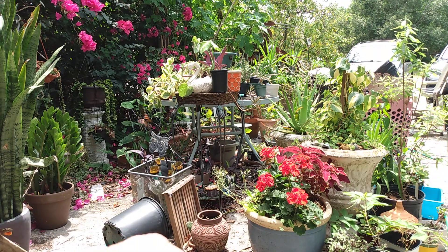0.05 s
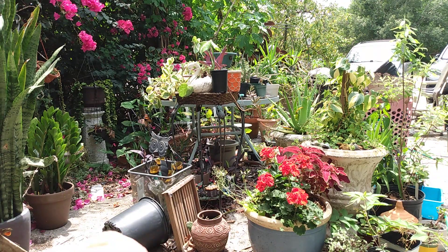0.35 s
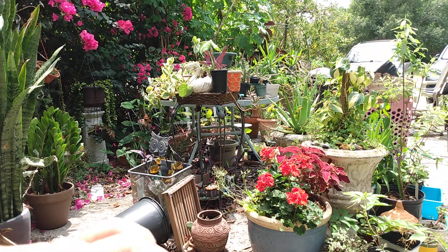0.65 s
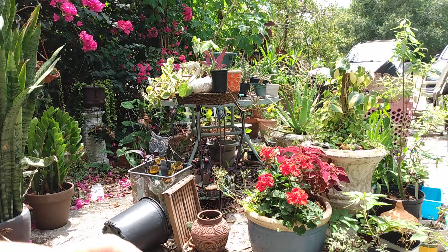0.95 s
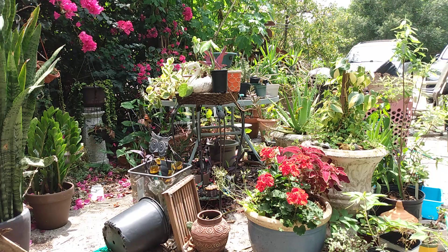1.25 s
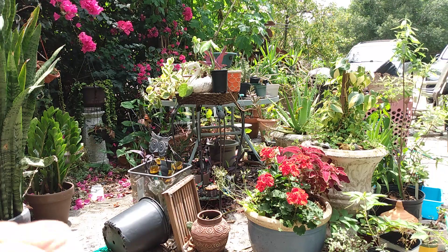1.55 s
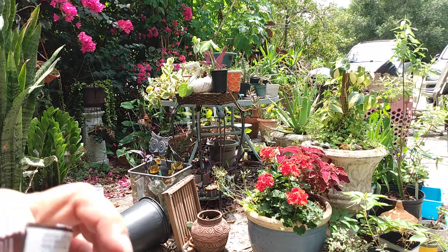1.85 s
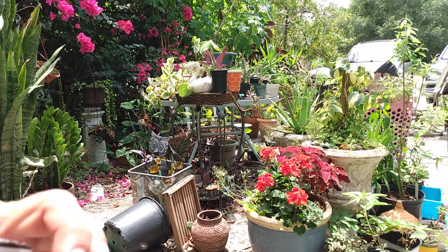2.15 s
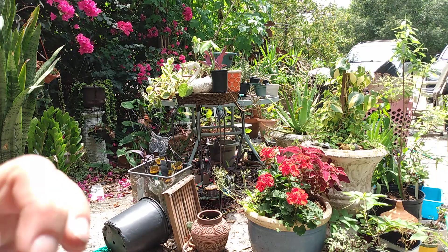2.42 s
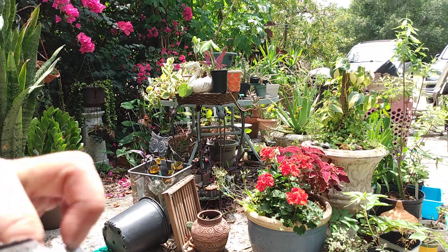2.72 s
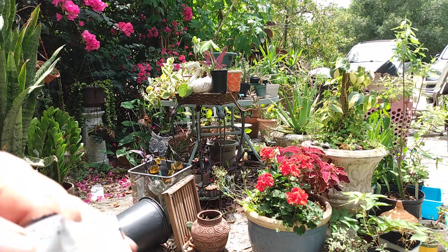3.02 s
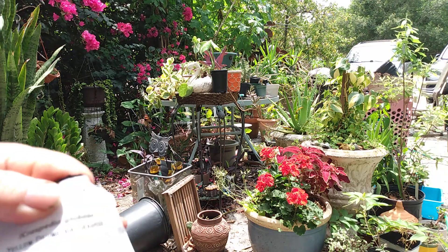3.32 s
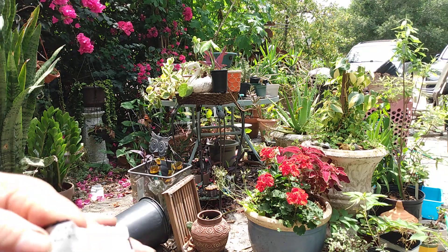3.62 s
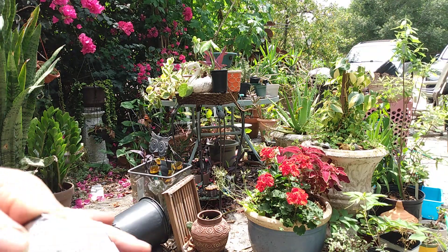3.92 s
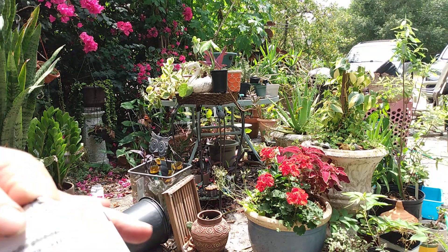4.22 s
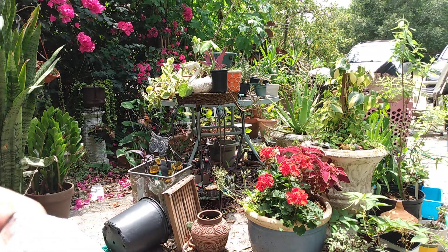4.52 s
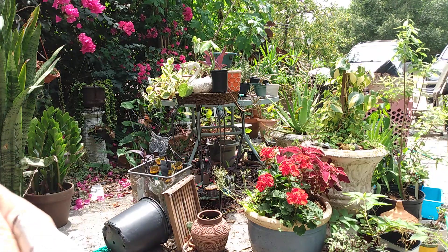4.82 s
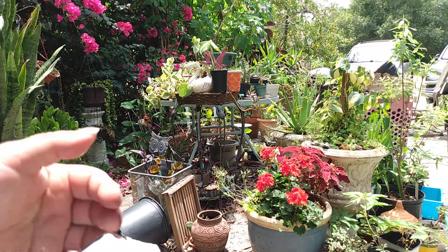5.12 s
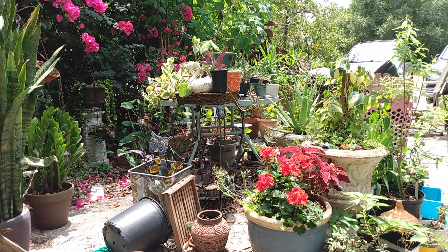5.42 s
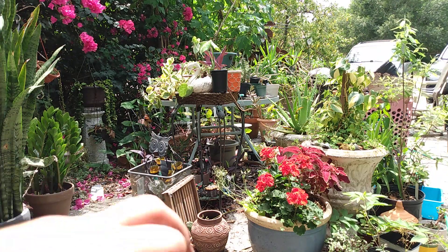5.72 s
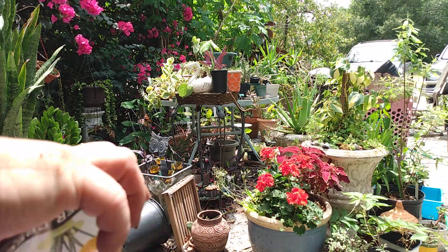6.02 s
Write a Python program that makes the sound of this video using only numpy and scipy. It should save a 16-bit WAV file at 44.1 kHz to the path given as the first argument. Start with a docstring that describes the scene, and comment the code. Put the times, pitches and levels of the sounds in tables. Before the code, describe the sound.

A paper seed packet is torn open and handled close by, with crinkles, crackles and short rips over a quiet garden's distant rumble.

```python
"""A paper seed packet, torn open and worked about by hand, close to the left of a camera's stereo microphone.
Fingers rub over the sheet, creases buckle and snap, and fibres part in short rips. A fingertip
catches and squeaks, and the packet bumps softly like a small drum.
The place is a quiet garden: far traffic and machines rumble and hum, under a faint hiss."""
import sys
import numpy as np
from scipy import signal
from scipy.fft import rfft, irfft, next_fast_len
from scipy.io import wavfile
from scipy.ndimage import uniform_filter1d, map_coordinates

SR = 44100
rng = np.random.default_rng(int(sys.argv[2]) if len(sys.argv) > 2 else 0)


def inscribe(sig):
    """Save sig as 16-bit PCM at rate SR to the path in sys.argv[1].

    A 1-D sig is mono; a 2-D sig holds one channel per row.
    Samples are clipped to [-1, 1] before scaling.
    """
    pcm = np.round(np.clip(np.atleast_2d(sig).T, -1, 1) * 32767)
    wavfile.write(sys.argv[1], SR, pcm.astype(np.int16))


N = 271215
T = np.arange(N) / SR
TOP_HZ = 16050  # the camera's band limit


def amp(db):
    return 10 ** (np.asarray(db) / 20)


def unit(x):
    """x at rms 1."""
    return x / np.sqrt(np.mean(x ** 2, axis=-1, keepdims=True) + 1e-20)


def curve(points):
    """One value per sample from (seconds, value) points."""
    return np.interp(T, *np.transpose(points))


def wobble(rate):
    """A smooth random curve, rate knots a second."""
    return map_coordinates(rng.standard_normal(int(N * rate / SR) + 4), [T * rate])


def filtered(x, response):
    """x through a gain that depends on frequency."""
    size = next_fast_len(N + SR // 4)
    return irfft(rfft(x, size) * response(np.fft.rfftfreq(size, 1 / SR)), size)[..., :N]


def equalised(x, points):
    """x through (Hz, dB) points joined on a log axis."""
    knots_hz, db = np.transpose(points)
    return filtered(x, lambda hz: amp(np.interp(np.log(hz + 1), np.log(knots_hz + 1), db)))


def coloured(x, spectrum):
    """x shaped by a spectrum, at rms 1."""
    return unit(equalised(x, spectrum))


def resonant(x, modes):
    """x through (Hz, width in Hz, dB) resonances, at rms 1."""
    def response(f):
        return sum(amp(db) / (1 + (2 * (f - hz) / width) ** 2) for hz, width, db in modes)
    return unit(filtered(x, response))


def band(x, edges_hz, order=3):
    """Causal band-pass."""
    return signal.sosfilt(signal.butter(order, edges_hz, "band", fs=SR, output="sos"), x)


def add(track, start, x):
    """Mix x into the track from start, in seconds."""
    part = track[..., max(round(start * SR), 0):][..., :x.shape[-1]]
    part += x[..., :part.shape[-1]]


def crackle(rate, spread_db, grain_t60, smooth):
    """One stream of tiny slips of uneven size over smooth friction noise, along two paths."""
    slips = rng.random(N) < rate / SR
    sizes = slips * amp(spread_db * np.minimum(rng.standard_normal(N), 2))
    grain_power = amp(-120 * T[:SR // 50] / grain_t60)
    power = np.abs(signal.fftconvolve(sizes ** 2, grain_power)[:N])
    return np.sqrt(power / power.mean() + smooth ** 2) * rng.standard_normal((2, N))


def flexing(x, depth_db):
    """The sheet's resonances keep shifting as it bends."""
    spectra = signal.stft(x, nperseg=256)[2]
    drift = uniform_filter1d(rng.standard_normal(spectra.shape[1:]), size=3, axis=0)  # over frequency
    drift = uniform_filter1d(drift, size=16, axis=1)  # over time
    spectra = spectra * amp(depth_db * drift / drift.std())
    return unit(signal.istft(spectra, nperseg=256)[1][..., :N])


# Far rumble, and a far hum that swells late. Each row: time in seconds, relative level in dB.
RUMBLE_SWELL = [(0, -60), (.7, -61.5), (1.5, -56.5), (2.2, -64.5), (3.2, -58.5), (4.2, -58), (5.2, -63),
                (6.15, -65)]
HUM_SWELL = [(0, -74), (2.2, -75.5), (4.6, -58.5), (5.25, -61.5), (5.45, -59), (5.62, -53), (5.85, -58),
             (6.15, -78)]
# Colours of the rumble and the faint hiss. Each row: frequency in Hz, relative level in dB.
RUMBLE_SPECTRUM = [(20, -67), (35, -7), (50, -4.5), (75, 1), (110, -2.5), (180, -8), (340, -12.5),
                   (450, -17.5), (800, -62)]
HISS_SPECTRUM = [(200, -11.5), (400, -13), (700, -5), (1100, -14.5), (2500, -13.5), (4500, -17),
                 (7000, -21.5), (16000, -22.5)]
# Resonances of the hum. Each row: centre in Hz, width in Hz, relative level in dB.
HUM_MODES = [(283, 19, 3), (310, 64, 9)]
# Far motors. Each row: pitch in Hz, relative level in dB.
MOTOR_TONES = [(79, -62.5), (223, -67)]


def garden(rumble_db=6.0, apart=0.17, hiss_db=-64.5, waver_db=3.5):
    """Far traffic and machines reach both microphone ports much alike; the hiss differs between them."""
    far = rng.standard_normal(N) + apart * rng.standard_normal((2, N))
    rumble = amp(curve(RUMBLE_SWELL) + rumble_db) * coloured(far, RUMBLE_SPECTRUM)
    hum = amp(curve(HUM_SWELL)) * resonant(rng.standard_normal(N), HUM_MODES)
    motors = np.zeros(N)
    for hz, db in MOTOR_TONES:
        peak = np.sqrt(2) * amp(db + waver_db * wobble(4.7))
        motors += peak * np.sin(2 * np.pi * hz * T + 0.66 * wobble(6.6))
    hiss = amp(hiss_db) * coloured(rng.standard_normal((2, N)), HISS_SPECTRUM)
    return (rumble + hum + motors + hiss) * amp([[1.7], [-1.7]])  # a little louder on the left


# Finger strokes. Each row: start in seconds, length in seconds, relative level in dB, brightness in dB.
FINGER_STROKES = [(0, 0.03, -41, -5), (0.076, 0.058, -59, 6), (0.179, 0.02, -57, 3.5),
                  (0.215, .06, -58, 2.5), (0.401, 0.076, -53, -4.5), (0.506, 0.061, -57.5, 2),
                  (0.59, 0.14, -60, 8), (0.738, 0.038, -46, -11), (0.791, 0.031, -46, 13.5),
                  (0.83, 0.12, -42.5, 2), (0.96, .06, -53, -3), (1.026, 0.035, -40.5, 1),
                  (1.082, 0.038, -44.5, 3), (1.207, .1, -39.5, -2), (1.296, 0.1, -44, 3.5),
                  (1.406, 0.032, -47, 1), (1.483, 0.038, -51, 0), (1.567, 0.077, -36.5, 1.5),
                  (1.658, 0.11, -49.5, -1.5), (1.82, 0.074, -52, -2.5), (1.927, 0.092, -58, 0),
                  (2.149, 0.0071, -62, 8.5), (2.26, 0.016, -56.5, 1), (2.399, .11, -58, 1),
                  (2.532, 0.077, -53, -2.5), (2.579, 0.066, -49.5, 2), (2.652, 0.053, -53.5, -0.5),
                  (2.732, 0.066, -54.5, 4), (2.771, 0.034, -41, -2), (2.933, 0.068, -56, 4),
                  (3, .085, -55.5, 2), (3.075, .14, -47, -4.5), (3.208, 0.14, -46.5, -2),
                  (3.309, 0.038, -43, -9), (3.355, 0.053, -40, -6), (3.44, .13, -46.5, -3),
                  (3.59, 0.28, -60.5, -3), (3.727, .125, -51, 1.5), (3.853, 0.19, -50, -7.5),
                  (3.948, 0.12, -49.5, -12.5), (4.116, .16, -51.5, -5), (4.312, 0.19, -54.5, 5.5),
                  (4.491, 0.071, -52, 4), (4.541, 0.094, -52.5, 0), (4.623, 0.13, -59, -0.5),
                  (4.717, 0.087, -52, -1.5), (4.884, .1, -54, -1.5), (4.971, 0.11, -50, 1),
                  (5.095, 0.023, -53, -1.5)]


def friction(arch=0.33, release_s=0.012, body_db=-2, body_per_bright=-0.61):
    """Low, middle and top amplitudes of the rubbing: in each stroke a finger speeds up, slows and stops."""
    power = np.zeros((3, N))
    for start, length, db, bright in FINGER_STROKES:
        progress = np.minimum(T[:SR // 3] / length, 1)
        swell = (4 * progress * (1 - progress)) ** arch
        flex_db = body_db + body_per_bright * bright  # light, bright strokes flex the sheet less
        colour = amp([[flex_db], [0], [bright]])
        add(power, start, (amp(db) * colour * swell) ** 2)
    decay = np.exp(-2 / (release_s * SR))
    return np.sqrt(signal.lfilter([1 - decay], [1, -decay], power) + 1e-20)


# Rubbed paper, heard close. Each row: frequency in Hz, relative level in dB.
RUB_SPECTRUM = [(71, -60), (120, 11.5), (217, 1.5), (251, -6.5), (370, -5), (473, -18.5), (856, -17),
                (1900, -14), (2240, -12), (3380, -17), (3900, -17.5), (5750, -16.5), (14700, -11.5),
                (16000, -17)]
# The paper's body, middle and top bands. Each row: lower edge in Hz, upper edge in Hz.
PAPER_BANDS = [(150, 900), (900, 4500), (4500, 16500)]


def rustle(middle_db=-0.45, top_db=-2, grip_db=1.5):
    """Fingers drag over the sheet with an uneven grip: coarse crinkles below, fine friction above."""
    low_swell, middle_swell, top_swell = friction()
    crinkles = crackle(rate=350, spread_db=2.0, grain_t60=0.0024, smooth=1.0)
    coarse = flexing(coloured(crinkles, RUB_SPECTRUM), depth_db=6.0)
    fine = coloured(crackle(rate=6300, spread_db=9.5, grain_t60=0.0022, smooth=0.62), RUB_SPECTRUM)
    low = low_swell * unit(band(coarse, (250, 1000)))
    middle = middle_swell * amp(middle_db) * unit(band(coarse + fine, PAPER_BANDS[1], order=4))
    top = top_swell * amp(top_db) * unit(band(fine, PAPER_BANDS[2]))
    return amp(grip_db * wobble(70)) * (low + middle + top)


def small_creases(per_s=26, until_s=5.13, ring_hz=2150, over_rub_db=1, spread_db=6, per_bright=-0.58):
    """Small creases give way at random, as strong as the rubbing allows; rows as in LOUD_CREASES."""
    _, middle, top = friction()
    count = int(per_s * until_s)
    moments = ((np.arange(count) + rng.random(count)) * SR / per_s).astype(int)
    rows = []
    for i, (size, octaves, weight, edge) in zip(moments, rng.uniform(-0.91, 1, (count, 4))):
        brightness = top[i] / middle[i]
        # light, bright slides buckle the sheet less
        rub_db = 20 * np.log10(middle[i]) + per_bright * 20 * np.log10(brightness)
        level_db = rub_db + over_rub_db + spread_db * size
        body_db = 5 + 3 * weight
        sharpness = 0.44 * brightness + 0.96 * edge
        rows.append((T[i], ring_hz * 2 ** octaves, level_db, body_db, sharpness))
    return rows


# Loud creases buckling. Each row: start in seconds, ring of the freed facet in Hz,
# relative level in dB, extra body in dB, sharpness from 0 to 1.
LOUD_CREASES = [(0.0097, 2860, -29.5, -2.5, 0.7), (0.4557, 4100, -30, -11, 0.62),
                (0.6197, 2900, -41.5, -3, 1), (0.6982, 3630, -34, -9, 0.44), (0.7421, 4870, -23, -8, 1),
                (0.763, 3100, -24, -28, 0.85), (0.8005, 2500, -34, -14, 0.5),
                (1.067, 4000, -23.5, -9.5, 0.64), (1.0927, 3700, -25.5, -17, .9),
                (1.213, 3840, -25, -10, 0.54), (1.2277, 3700, -31.5, -15, .7),
                (1.2367, 2220, -27.5, -24, .55), (1.2564, 3740, -24.5, -5, 0.89),
                (1.2943, 3800, -24.5, -0.5, 0.92), (1.589, 1670, -24.5, -28, 1),
                (1.6224, 1680, -24.5, 2, 0.7), (1.641, 1180, -29.5, 1, 0), (1.6969, 3740, -34.5, -2, 0.43),
                (2.0053, 2000, -42.5, 0.5, 0.87), (2.2804, 1520, -50.5, 12, 0.2),
                (2.3536, 1720, -48.5, 6.5, 0.53), (2.438, 1500, -50, 9.5, 0),
                (2.4721, 1670, -30.5, -11.5, 0), (2.5975, 4200, -27, -1.5, 0.52),
                (2.6429, 1540, -30.5, -1.5, 0.3), (2.6937, 2660, -40.5, -15, 0.1),
                (2.971, 990, -44.5, 2, 0), (3.0734, 2230, -20, 0, 0), (3.1567, 2540, -23.5, -7, 0.39),
                (3.168, 910, -40.5, 12.5, 0), (3.2197, 1600, -35.5, 0.5, 0), (3.259, 2600, -32.5, 1, 0.4),
                (3.3198, 2360, -30.5, -0.5, 0), (3.331, 890, -42, 10, 0.7), (3.3566, 2120, -17, 1, 0.82),
                (3.3748, 1770, -24.5, -12, 0.4), (3.3924, 2520, -25.5, -3, 0),
                (3.5273, 4850, -21.5, -7.5, 0.91), (3.5671, 2310, -33, -6, 0), (3.6528, 2450, -46, 9.5, 0),
                (3.753, 930, -45.5, 8, .2), (3.902, 900, -40, 7, 0), (3.976, 1720, -47, 16, 0.85),
                (4.0561, 2470, -29.5, 2.5, 0.37), (4.2588, 2280, -42, 1, 0),
                (4.2897, 2980, -26, -2.5, 0.29), (4.3476, 2800, -43.5, 4.5, 0.84),
                (4.4508, 1500, -44, 0, .7), (4.598, 2310, -42, -17, 0), (4.759, 2440, -30, -5, 0),
                (4.7814, 2570, -27.5, -1.5, 0.06), (4.9005, 2500, -32, -1.5, 0),
                (5.0155, 1320, -32, 3.5, 0), (5.5263, 1530, -56, 7.5, 0), (5.8908, 4440, -54.5, 0, 0.87)]


def snaps(scatter_db=-11, scatter_t60=0.015, tail_db=-39, tail_t60=0.32, ring_db=-21, ring_t60=0.014):
    """A crease flips: a pulse bounces off the packet's edge, a facet rings, waves scatter in the sheet."""
    out, t = np.zeros((2, N)), T[:SR // 10]
    scatter = amp(scatter_db - 60 * t / scatter_t60) + amp(tail_db - 60 * t / tail_t60)
    for start, hz, level, body, sharpness in LOUD_CREASES + small_creases():
        pulse = scatter * rng.standard_normal((2, len(t)))
        lower_hz = hz * rng.uniform(0.51, 0.845)
        facet = np.sin(2 * np.pi * hz * t) + 0.5 * np.sin(2 * np.pi * lower_hz * t)
        pulse += amp(ring_db - 60 * t / ring_t60) * facet
        pulse[0, 0] += 2  # the direct push
        pulse[:, round(rng.uniform(0.0003, 0.0012) * SR)] -= 0.188  # its bounce
        pulse *= rng.choice([-1, 1])
        # a slow, soft flip has little edge, and its upper bands end lower
        edge_db = np.interp(sharpness, (0, 1), (-23, 3))
        edge_band = (4200, np.interp(sharpness, (0, 1), (8000, TOP_HZ)))
        crack_from_hz = np.clip(0.336 * hz, 850, 1150)  # a small, high facet cracks higher
        crack_band = (crack_from_hz, np.interp(sharpness, (0, 1), (3100, 4700)))
        for edges_hz, db in ((PAPER_BANDS[0], body - 2), (crack_band, 1), (edge_band, edge_db)):
            part = band(pulse, edges_hz)
            onset_rms = np.sqrt(np.mean(part[:, :SR // 200] ** 2, axis=1, keepdims=True))  # first 5 ms
            add(out, start, amp(level + db) * part / onset_rms)
    return out


# Pulls on the tear. Each row: start in seconds, number of jerks, relative level in dB, dB change per jerk.
PULLS = [(0.112, 1, -43, 0), (0.867, 3, -28.5, -0.5), (1.05, 1, -25.5, 0), (1.25, 3, -32, -3),
         (1.332, 2, -28, -3.5), (1.372, 4, -25, -1), (1.458, 1, -29, 0), (1.483, 2, -26.5, -9),
         (1.554, 1, -40.5, 0), (1.5863, 4, -20.5, -2.5)]
# Breaking fibres. Each row: frequency in Hz, relative level in dB.
TEAR_SPECTRUM = [(150, -35), (250, -6), (510, -2), (875, -0.5), (1060, -17), (1240, -9), (2200, -14),
                 (2760, -6.5), (3710, -2), (6040, -16.5), (12800, 0), (16000, -7.5)]


def rips(spacing_s=0.0179, jerk_s=0.0085, jitter_s=0.00072, spread_db=0.5):
    """Each pull advances the tear in quick jerks, and each jerk breaks a dense run of fibres."""
    power, t = np.zeros(N), T[:SR // 10]
    jerk = np.exp(-np.minimum((2 * (t - t.mean()) / jerk_s) ** 2, 80))
    for (start, jerks, db, change), chance in zip(PULLS, rng.standard_normal((len(PULLS), 8, 2))):
        for k, (late, size) in enumerate(chance[:round(jerks)]):
            level = db + change * k + spread_db * size
            peak_s = start + k * spacing_s + jitter_s * late
            add(power, peak_s - t.mean(), amp(2 * level) * jerk)
    fibres = crackle(rate=2500, spread_db=5, grain_t60=0.0015, smooth=0.057)
    return np.sqrt(power) * flexing(coloured(fibres, TEAR_SPECTRUM), depth_db=1)


# A fingertip catches twice. Each row: time in seconds, level in dB.
SQUEAK_SWELL = [(1.82, -78), (1.85, -40.5), (1.885, -48.5), (1.92, -107), (2.0, -46), (2.04, -85)]
# Resonances of the taut sheet. Each row: centre in Hz, width in Hz, relative level in dB.
SHEET_MODES = [(2140, 260, -0.5), (2480, 160, -11), (3740, 280, -4)]


def squeak():
    """Quick slips of a fingertip set the taut sheet singing."""
    slips = crackle(rate=210, spread_db=3, grain_t60=0.018, smooth=0.2)
    return amp(curve(SQUEAK_SWELL)) * resonant(slips, SHEET_MODES)


# Hand meets packet. Each row: start in seconds, pitch in Hz, relative level in dB, t60 in seconds.
HAND_BUMPS = [(2.79, 110, -22.5, 0.061), (3.355, 287, -39, 0.075), (3.36, 61, -34.5, 0.11),
              (4.042, 303, -24, 0.041), (4.756, 94, -30, 0.099), (5.018, 218, -13.5, 0.019)]


def bumps(attack_s=0.0048, puff=0.67):
    """The packet pushes air like a small soft drum."""
    out, t = np.zeros((2, N)), T[:SR // 6]
    for start, hz, db, t60 in HAND_BUMPS:
        air = unit(band(rng.standard_normal(len(t)), (hz / 2, hz * 2), order=2))
        envelope = amp(db - 60 * t / t60) * (1 - np.exp(-t / attack_s))
        add(out, start, envelope * (np.sin(2 * np.pi * hz * t) + puff * air))
    return out


# The packet shifts about, close on the left, and drifts toward the middle.
# Each row: time in seconds, delay at the right port in seconds.
RIGHT_DELAY = [(0.5, 0.00052), (0.65, 0.00023), (1.0, 0.00008), (1.26, 0.0005), (1.6, 0.00041),
               (2.5, 0.00037), (3.1, 0.00031), (4.1, 0.00026)]
# The camera body shades the right port. Each row: frequency in Hz, gain in dB.
CAMERA_SHADOW = [(60, -3), (200, -7), (400, -8), (750, -7.5), (1300, -4), (2400, -5.5), (4400, -8),
                 (8000, -11.5), (16000, -12.5)]


def from_left(paths, alike=0.55):
    """The microphone's right port hears the packet later, shaded and partly by other paths."""
    right = alike * paths[0] + np.sqrt(1 - alike ** 2) * paths[1]
    delayed = map_coordinates(right, [(T - curve(RIGHT_DELAY)) * SR], order=5)
    return np.array([paths[0], equalised(delayed, CAMERA_SHADOW)])


# A mild tone curve on the snaps and rips. Each row: frequency in Hz, gain in dB.
SNAP_AND_RIP_TONE = [(1200, -2), (1750, 0.5), (2400, 0), (3500, -2.5), (5300, 1), (7500, 0.5), (10000, -4),
                     (13000, 0), (16000, -2.5)]


def scene():
    """The packet close to the microphone's left, the garden far behind."""
    paper = equalised(snaps() + rips(), SNAP_AND_RIP_TONE)
    return from_left(paper + rustle() + squeak() + bumps()) + garden()


def record(dry):
    """The camera cuts off steeply above its band limit."""
    return filtered(dry, lambda hz: 1 / np.sqrt(1 + (hz / TOP_HZ) ** 160))


dry = scene()
out = record(dry)
inscribe(out)
```